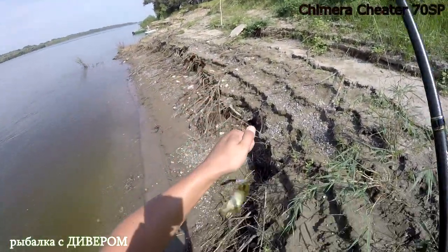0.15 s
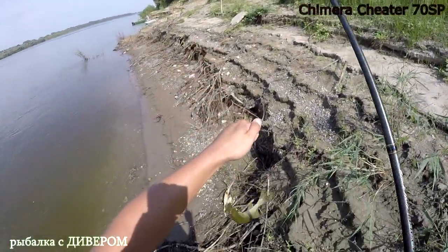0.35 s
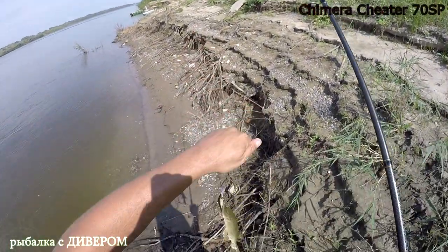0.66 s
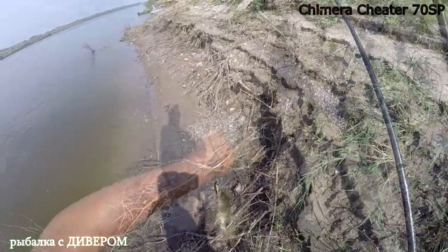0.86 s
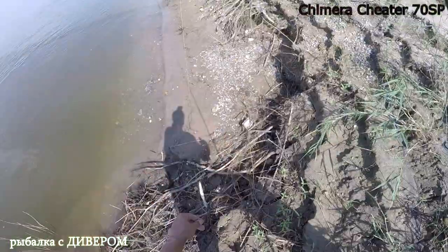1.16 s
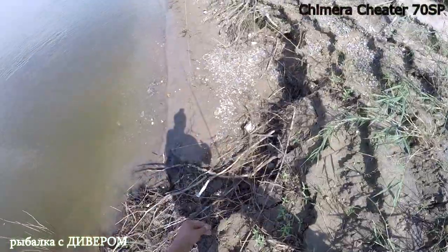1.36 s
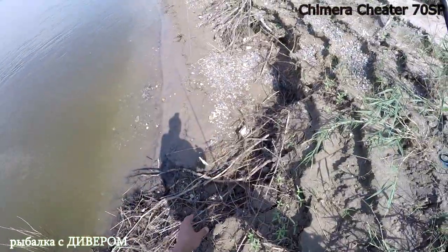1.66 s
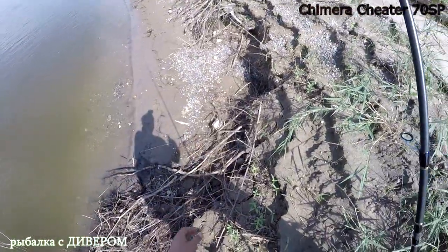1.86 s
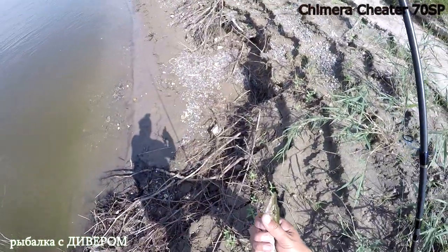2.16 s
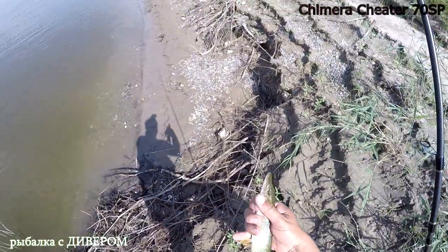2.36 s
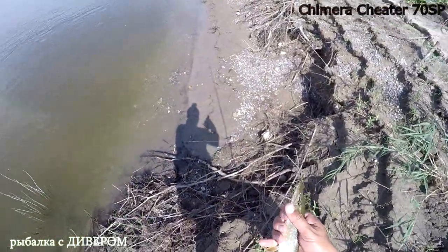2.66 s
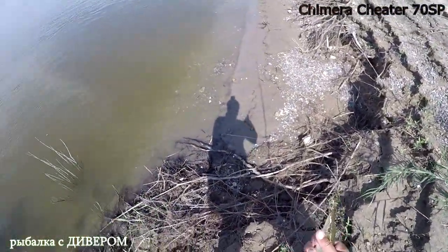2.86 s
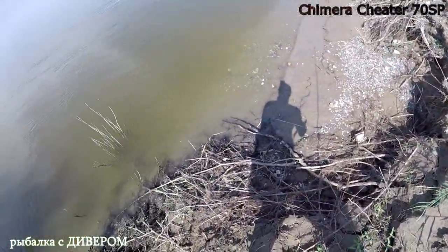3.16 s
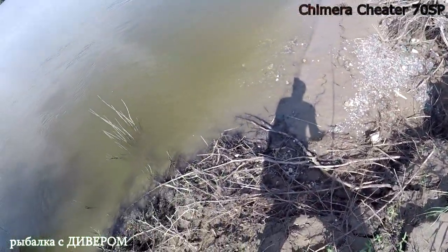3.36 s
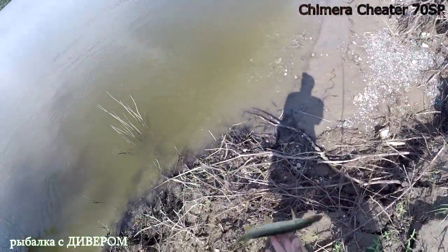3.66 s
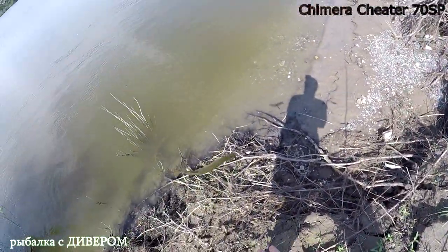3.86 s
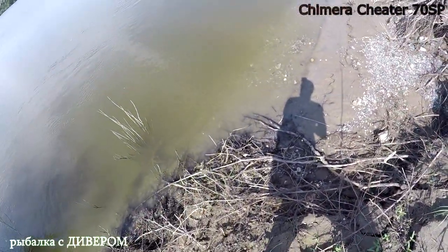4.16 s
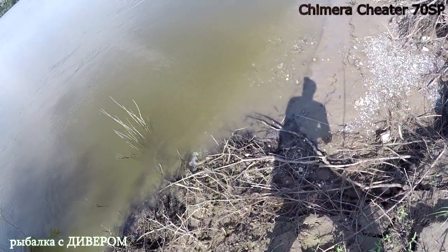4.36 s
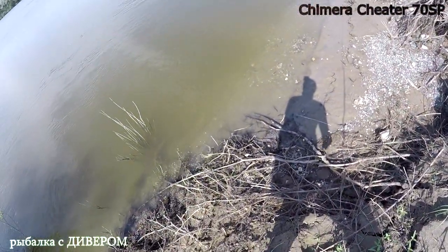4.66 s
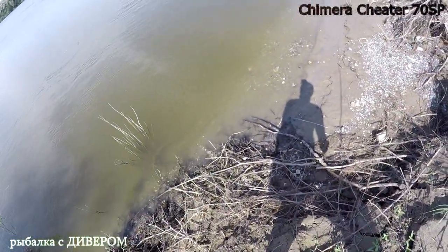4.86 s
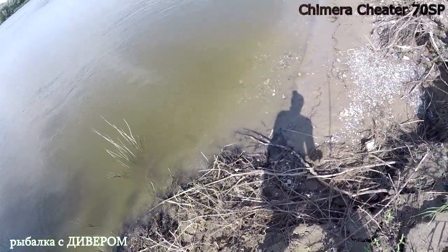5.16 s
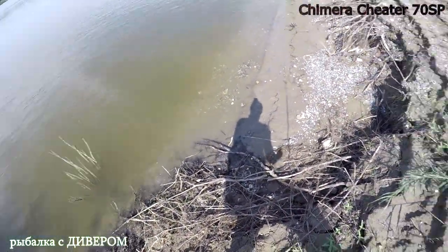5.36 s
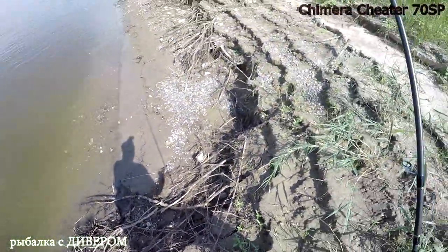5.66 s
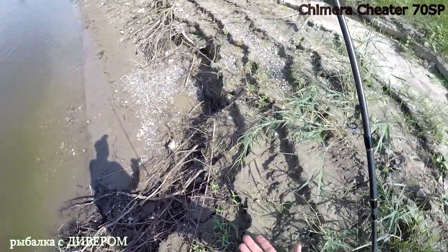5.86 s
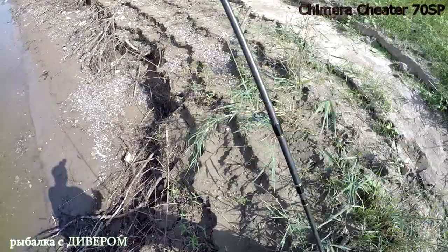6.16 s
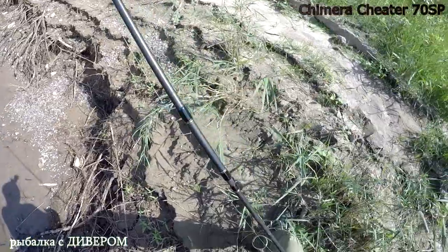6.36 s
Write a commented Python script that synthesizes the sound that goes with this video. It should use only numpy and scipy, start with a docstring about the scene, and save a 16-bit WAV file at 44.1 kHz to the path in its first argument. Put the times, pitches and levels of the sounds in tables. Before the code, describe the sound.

Dry roots and twigs crackle briefly close to the microphone on a quiet riverbank. Light wind rumbles and hisses while insects give faint, high trills over a weak, distant drone. After two soft handling knocks, a small fish slaps into the shallows and flicks away with light splashes and bubbles. One more dull knock comes near the end.

```python
"""Small fish on a riverbank

A fish is swung in over dry roots, which crackle, and handled with soft knocks. Tossed back,
it slaps into the shallows and flicks away among ringing bubbles. Insects scrape their wings in
overlapping trills. Light wind rumbles on the microphone and hisses in the grass over a far drone."""
import sys
import numpy as np
from scipy import signal
from scipy.fft import rfft, irfft
from scipy.io import wavfile
from scipy.ndimage import map_coordinates

SR = 44100
rng = np.random.default_rng(int(sys.argv[2]) if len(sys.argv) > 2 else 0)


def to_wav(sig):
    """Store sig (one row per channel, or 1-D mono) as 16-bit WAV at the path in sys.argv[1].

    Samples outside -1..1 are clipped; the rate is SR.
    """
    pcm = np.clip(np.atleast_2d(sig), -1, 1) * 32767
    pcm = np.round(pcm).astype(np.int16)
    wavfile.write(sys.argv[1], SR, pcm.T)  # frames by channels


N = 286684


def seconds(samples=N):
    """Time of each sample."""
    return np.arange(samples) / SR


def from_db(db):
    """Decibels to gain."""
    return 10 ** (np.asarray(db) / 20)


def unit_rms(x):
    """Scale to rms 1."""
    return x / np.sqrt(np.mean(x ** 2) + 1e-20)


def curve(rows):
    """Straight lines through (seconds, value) points."""
    return np.interp(seconds(), *np.transpose(rows))


def add(out, start_s, sound):
    """Mix a short sound in."""
    at = int(np.clip(round(start_s * SR), 0, N - 1))
    out[at:at + len(sound)] += sound[:N - at]


def drift(per_s):
    """Slow random wander, rms 1."""
    knots = rng.standard_normal(4000)
    return unit_rms(map_coordinates(knots, [seconds() * per_s], order=1, mode="wrap"))


def swells(rows):
    """Summed gain of swells that rise and decay exponentially."""
    t = seconds()
    return sum(from_db(db) * np.exp(-np.maximum((peak_s - t) / rise_s, (t - peak_s) / decay_s))
               for peak_s, db, rise_s, decay_s in rows)


def coloured(x, colour, size=8192):
    """Minimum-phase filter of unit mean power gain, rolled off below the first (Hz, dB) point."""
    hz, db = np.transpose(colour)
    bin_hz = np.maximum(np.arange(size // 2 + 1) * SR / size, 1)
    shape = from_db(np.interp(np.log(bin_hz), np.log(hz), db))
    gain = unit_rms(shape / np.sqrt(1 + (hz[0] / bin_hz) ** 2 / 2))
    cepstrum = irfft(np.log(gain + 1e-6))[:size // 2]
    cepstrum[0] /= 2
    impulse = irfft(np.exp(rfft(2 * cepstrum, size)))
    return signal.fftconvolve(x, impulse)[:N]


def resonance(x, hz, width_hz):
    """Two-pole band-pass, peak gain 1."""
    r, w = np.exp(-np.pi * width_hz / SR), 2 * np.pi * hz / SR
    return signal.lfilter(np.array([1, 0, -1]) * (1 - r * r) / 2, [1, -2 * r * np.cos(w), r * r], x)


def grains(per_s, spread_db):
    """Random clicks of uneven size, rms 1."""
    sizes = from_db(spread_db * np.minimum(rng.exponential(1, N), 4)) * rng.choice([-1, 1], N)
    return unit_rms(sizes * (rng.random(N) < per_s / SR))


def burst(decay_s, hz, width_hz, ring_db):
    """A dying spray of contacts excites one resonance; energy grows with decay_s."""
    t = seconds(3000)
    spray = rng.standard_normal(len(t)) * np.exp(-t / decay_s)
    ring = from_db(ring_db) * resonance(spray, hz, width_hz)
    return unit_rms(spray + ring) * np.sqrt(decay_s * SR / len(t))


# Gusts. Each row: centre in seconds, level in dB, half length in seconds.
GUSTS = [(0.127, -39.5, 0.094), (.5, -47.5, 0.98), (2.648, -37.5, .05), (2.82, -40, 0.17),
         (5.48, -42.5, 0.11)]
# Spectra of turbulence and open air. Each row: frequency in Hz, relative level in dB.
BUFFET_COLOUR = [(11, -11), (18, 5), (37, 4.5), (123, -7.5), (152, -17.5), (300, -26.5), (390, -48.5),
                 (660, -120)]
AIR_COLOUR = [(100, 15), (200, 10.5), (350, 5.5), (700, 3.5), (1500, 0), (3000, -3.5), (5500, -8.5),
              (7500, -12.5), (10000, -12), (13000, -20.5), (15500, -23)]


def wind(buffet_db=-46, air_db=-50, lumps_db=1.3):
    """Lumpy, gusting turbulence at the microphone and the smooth hiss of the open bank."""
    t = seconds()
    gust_power = sum(from_db(db) ** 2 * np.exp(-((t - centre_s) / half_s) ** 2)
                     for centre_s, db, half_s in GUSTS)
    force = np.sqrt(from_db(buffet_db) ** 2 + gust_power) * from_db(lumps_db * drift(per_s=14))
    buffet = force * unit_rms(coloured(rng.standard_normal(N), BUFFET_COLOUR))
    air = from_db(air_db) * unit_rms(coloured(rng.standard_normal(N), AIR_COLOUR))
    return buffet + air


# Grass hiss. Each row: time in seconds, level in dB.
GRASS_LEVELS = [(0, -56), (1.5, -59.5), (2.5, -61), (4.2, -77), (5.2, -61), (5.8, -53.5), (6.5, -56.5)]


def grass(hz=3200, width_hz=3600):
    """The breeze hisses softly through the grass."""
    hiss = resonance(rng.standard_normal(N), hz, width_hz)
    return from_db(curve(GRASS_LEVELS)) * unit_rms(resonance(hiss, hz, width_hz))


# Far drone. Each row: time in seconds, level before fading in dB.
DRONE_LEVELS = [(0, -68), (1.3, -51), (2.6, -55), (3.6, -52), (4.7, -57), (6.5, -63)]


def drone(hz=129.2, waver=0.01936, fading_db=3):
    """A far low tone wavers and fades on the wind."""
    pitch_hz = hz * (1 + waver * drift(per_s=12))
    phase = 2 * np.pi * np.cumsum(pitch_hz) / SR
    return from_db(curve(DRONE_LEVELS) + fading_db * drift(per_s=11)) * np.sin(phase)


# Twigs snapping. Each row: start in seconds, level in dB.
SNAPS = [(0.0142, -15), (0.0168, -12.5), (0.0287, -13), (0.031, -24), (.044, -18.5), (.0523, -16.5),
         (0.1187, -14), (0.1456, -15.5), (.196, -21), (0.2464, -21), (.322, -28), (.329, -28), (.392, -28),
         (.441, -26.5)]
# Stalks crushed. Each row: start in seconds, level before colouring in dB, ring in Hz.
CRUNCHES = [(0.0, -29.5, 5670), (.019, -28.5, 3100), (0.029, -31.5, 970), (.052, -37, 2190),
            (.11, -27, 2630), (0.124, -27.5, 2630), (.139, -28, 5400), (.16, -24, 2360), (.164, -25, 1380),
            (.17, -33, 3550), (0.241, -27.5, 5740), (0.267, -38, 6550)]
# Roots pressed. Each row: peak time in seconds, level in dB, rise and decay in seconds.
PRESSES = [(.025, -34, 0.092, 0.06), (.17, -35.5, 0.066, 0.036), (.25, -39, 0.018, 0.046)]
# Spectrum of crunch and rustle. Each row: frequency in Hz, relative level in dB.
TWIG_COLOUR = [(300, -1), (450, -11), (850, -4.5), (1260, -3), (1900, -5.5), (2700, 2), (4400, 2),
               (5600, 1.5), (8500, -1.5), (12000, -2.5), (15500, -14)]


def twigs(snap_hz=6630, pitch_scatter=0.062, ring_db_per_db=0.94, ticks_db=-10):
    """Twigs snap, stalks crunch, pressed roots rustle and tick; weak snaps are more ring than crack."""
    snaps, crunches = np.zeros(N), np.zeros(N)
    loudest_db = max(db for _, db in SNAPS)
    for start_s, db in SNAPS:
        hz = snap_hz * (1 + pitch_scatter * rng.standard_normal())
        ring_db = 9 + ring_db_per_db * (loudest_db - db)
        add(snaps, start_s, from_db(db) * burst(decay_s=0.00017, hz=hz, width_hz=530, ring_db=ring_db))
    for start_s, db, hz in CRUNCHES:
        add(crunches, start_s, from_db(db) * burst(decay_s=0.0042, hz=hz, width_hz=190, ring_db=12.5))
    pressure = swells(PRESSES)
    rustle = grains(per_s=1500, spread_db=4)
    clicks = grains(per_s=110, spread_db=1.5) + 1e-18
    ticks = from_db(ticks_db) * unit_rms(resonance(clicks, snap_hz, width_hz=1300))
    return snaps + pressure * ticks + coloured(crunches + pressure * rustle, TWIG_COLOUR)


# Wing pulses, fundamental then octave. Each row: relative level in dB, length in seconds.
WING_PULSES = [(-.3, 0.0069), (0, 0.0053)]


def wing_stroke(hz, sweep, low_db, top_db, ring_db=-5, octave_ring_db=-4, rasp_db=-11):
    """Scraper crosses file: a gliding tone rings the membrane; the teeth rasp and excite a top mode."""
    t = seconds(500)
    pitch_hz = hz * (1 + sweep * .65 * np.tanh((t - .0016) / .003))
    phase = 2 * np.pi * np.cumsum(pitch_hz) / SR
    low_pulse, octave_pulse = [from_db(db) * np.sin(np.pi * np.minimum(t / length_s, 1) ** 0.42)
                               for db, length_s in WING_PULSES]
    fundamental = from_db(low_db) * low_pulse * np.sin(phase)
    octave = octave_pulse * np.sin(2 * phase)
    membrane = from_db(ring_db) * resonance(fundamental, hz * 1.03, width_hz=50)
    membrane += from_db(octave_ring_db) * resonance(octave, hz * 2.01, width_hz=220)
    teeth = octave_pulse * rng.standard_normal(len(t))
    rasp = from_db(rasp_db) * resonance(teeth, hz * 2.23, width_hz=15000)
    top_mode = from_db(top_db) * resonance(teeth, hz * 2.87, width_hz=330)
    return fundamental + octave + membrane + rasp + top_mode


def through_grass(trill, share, decay_s=.009):
    """Stems and ground smear a share of the trill's power."""
    t = seconds(2500)
    echoes = rng.standard_normal(len(t)) * np.exp(-t / decay_s)
    scattered = signal.oaconvolve(trill, echoes / np.linalg.norm(echoes))[:N]
    return np.sqrt(1 - share) * trill + np.sqrt(share) * scattered


# Insect phrases. Each row: start and end in seconds, strokes per second, pitch in Hz, sweep depth,
# relative level in dB, fundamental against octave in dB, how hidden in the grass from 0 to 1.
TRILLS = [(0.3, 0.861, 73, 4880, 0.39, -53.5, -1.5, 0.13),
          (0.804, 1.489, 69.1, 4910, 0.23, -57.5, -1.5, 0.63),
          (.7, 1.484, 71.3, 4530, 0.15, -59, 1.5, 0.56), (1.522, 1.997, 58.9, 4420, .09, -60.5, -6, 0.076),
          (1.796, 2.289, 60.8, 4560, 0.22, -53.5, 1.5, 0.19),
          (2.202, 3.022, 66.45, 4595, 0.16, -51.5, -1, 0.28),
          (2.85, 3.348, 72.1, 4854, 0.17, -52, -3, 0.25),
          (3.205, 3.708, 64.16, 4616, 0.17, -54.5, -3.5, 0.14),
          (3.552, 4.108, 71.9, 4510, 0.26, -50, 0.5, 0.15),
          (4.703, 5.53, 66.04, 4770, 0.26, -57.5, -1, 0.68), (5.103, 5.664, 66, 4430, 0.15, -58, -5, 0.66),
          (5.429, 6.071, 63.35, 4594, 0.15, -54, 4.5, 0.18), (6.15, 6.803, 61.5, 4620, 0.31, -55, 0.5, .22)]


def insects(gain_db=9, slowing=.04):
    """Wing strokes with weak returns; a phrase swells and rises with effort, slows and stops dead."""
    swell_share, swell_db, pitch_rise = 0.41, 10.5, .025
    full_stroke_db, full_top_db, top_db_per_db = -52, -7.5, 0.54
    return_s, return_db, return_low_db = .0056, -7, -7
    pitch_jitter, jitter_s, force_jitter_db = .1, 6e-5, .7
    out = np.zeros(N)
    for start_s, end_s, per_s, hz, sweep, level_db, low_db, hidden in TRILLS:
        trill, at_s = np.zeros(N), start_s
        for detune, force, lag, return_lag in rng.standard_normal((90, 4)):
            progress = (at_s - start_s) / (end_s - start_s)
            effort_db = -swell_db * max(1 - progress / swell_share, 0)
            stroke_db = level_db + effort_db
            top_db = full_top_db + top_db_per_db * min(stroke_db - full_stroke_db, 0)
            waver = pitch_jitter * hidden ** 2 * detune
            pitch_hz = hz * (1 + pitch_rise * effort_db / swell_db + waver)
            gain = (at_s < end_s) * from_db(stroke_db + gain_db + force_jitter_db * force)
            forward = wing_stroke(pitch_hz, sweep, low_db, top_db)
            back = from_db(return_db) * wing_stroke(pitch_hz, -sweep, low_db + return_low_db, top_db)
            add(trill, at_s + lag * jitter_s, gain * forward)
            add(trill, at_s + return_s + return_lag * jitter_s, gain * back)
            at_s += 1 / (per_s * (1 - slowing * (progress - .5)))
        out += through_grass(trill, share=min(hidden, .5))
    return out


# Handling knocks. Each row: start in seconds, gain in dB.
KNOCKS = [(3.277, -45), (3.522, -44.5), (6.015, -37.5), (6.024, -41.5)]
# Knock modes. Each row: frequency in Hz, relative level in dB, T60 in seconds.
KNOCK_MODES = [(244, 6.5, 0.026), (523, 9, 0.011), (664, -13, 0.035), (880, -6, 0.022)]


def knocks():
    """Dull bumps of handling, each ringing the same damped modes."""
    out, t = np.zeros(N), seconds(5000)
    body = sum(from_db(db - 60 * t / t60_s) * np.sin(2 * np.pi * hz * t)
               for hz, db, t60_s in KNOCK_MODES)
    for start_s, db in KNOCKS:
        add(out, start_s, from_db(db) * body)
    return out


# Slaps and flicks. Each row: start in seconds, level before colouring in dB, decay in seconds.
SLAPS = [(4.254, -33, 0.0013), (4.2585, -26.5, .0018), (4.288, -41, .0016), (4.405, -42.5, 0.0043),
         (4.426, -40.5, 0.0062), (4.49, -46, 0.006), (4.613, -41, 0.002), (4.665, -48, .0018),
         (4.745, -33.5, 0.0012), (4.75, -36.5, 0.0032), (4.959, -39.5, 0.0018), (4.98, -43, 0.0071)]
# Slap spectrum. Each row: frequency in Hz, relative level in dB.
SLAP_COLOUR = [(250, 9.5), (520, 1), (1040, 1), (2400, 9.5), (5400, 3.5), (6800, 1.5), (8000, -7),
               (14000, -15)]


def slaps():
    """Body and tail slap the surface."""
    out = np.zeros(N)
    for start_s, db, decay_s in SLAPS:
        add(out, start_s, from_db(db) * burst(decay_s, hz=5300, width_hz=1200, ring_db=4.5))
    return coloured(out, SLAP_COLOUR)


# Largest bubbles. Each row: start in seconds, level in dB, starting pitch in Hz.
BUBBLES = [(4.253, -22, 2030), (4.258, -26.5, 1040), (4.258, -30.5, 2750), (4.397, -26, 1020),
           (4.405, -23, 880), (4.48, -29, 2810), (4.572, -33.5, 1280), (4.664, -35, 744),
           (4.721, -34, 1950), (4.872, -28, 3100), (4.93, -31, 910), (4.96, -29, 1630), (4.97, -31, 700),
           (4.98, -34.5, 2680)]


def bubbles(t60_s=.02, chirp_per_s=7):
    """Trapped air starts ringing within a cycle and climbs in pitch as it dies."""
    out, t = np.zeros(N), seconds(4000)
    for start_s, db, hz in BUBBLES:
        envelope = (1 - np.exp(-t * hz)) * from_db(db - 60 * t / t60_s)
        add(out, start_s, envelope * np.sin(2 * np.pi * hz * t * (1 + chirp_per_s * t)))
    return out


# Churned water. Each row: peak time in seconds, level in dB, rise and decay in seconds.
CHURNS = [(4.26, -50, .005, 0.039), (4.4, -49, .08, 0.12), (4.96, -47, 0.16, .08)]


def droplets(bands=20, spray_db=-10):
    """Drops patter and fine spray ticks as the fish lands and darts off."""
    drops = grains(per_s=800, spread_db=2.5)
    drop_band = rng.integers(0, bands, N)
    patter = sum(resonance(drops * (drop_band == band) + 1e-18, hz, width_hz=hz / 14) / np.sqrt(hz)
                 for band, hz in enumerate(np.geomspace(700, 6000, bands)))
    fine_drops = grains(per_s=160, spread_db=5) + 1e-18
    spray = from_db(spray_db) * unit_rms(resonance(fine_drops, hz=9000, width_hz=1500))
    return swells(CHURNS) * (unit_rms(patter) + spray)


def scene():
    """The bank and the fish, in mono."""
    bank = wind() + grass() + drone() + insects()
    fish = twigs() + knocks() + slaps() + bubbles() + droplets()
    return (bank + fish)[None]


def record(dry):
    """Steep low-pass."""
    stop_hz, stop_db = 15950, 55
    return signal.sosfilt(signal.cheby2(16, stop_db, stop_hz, fs=SR, output="sos"), dry)


dry = scene()
out = record(dry)
to_wav(out)
```